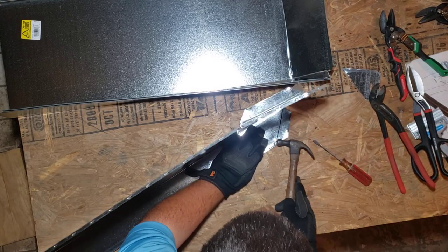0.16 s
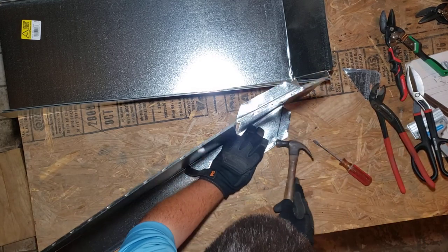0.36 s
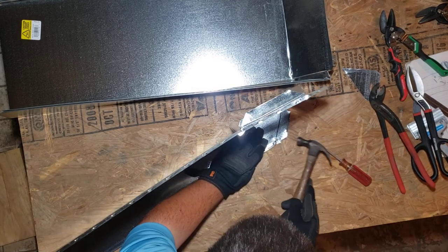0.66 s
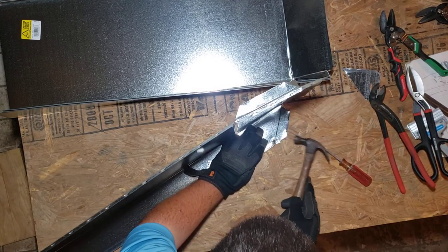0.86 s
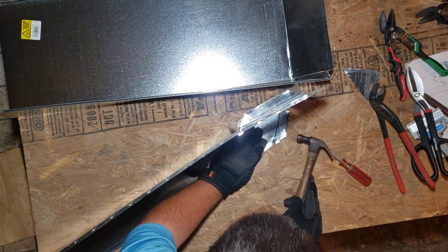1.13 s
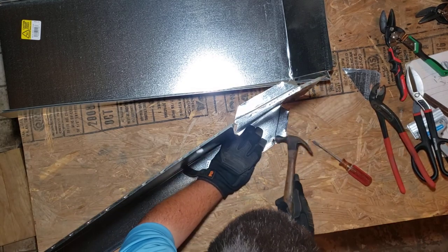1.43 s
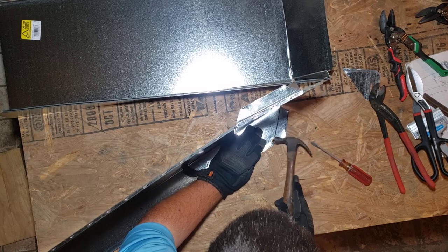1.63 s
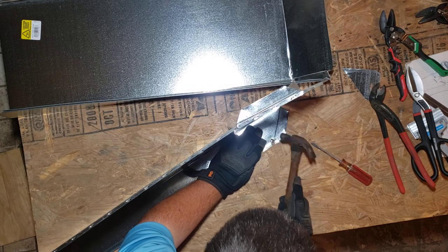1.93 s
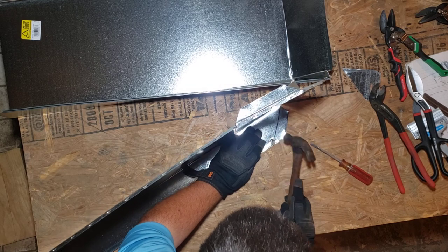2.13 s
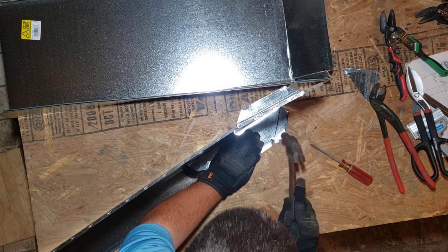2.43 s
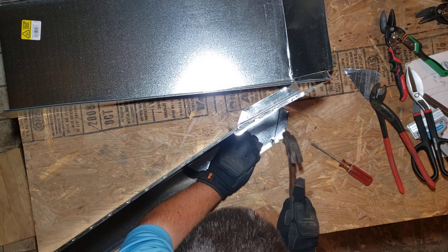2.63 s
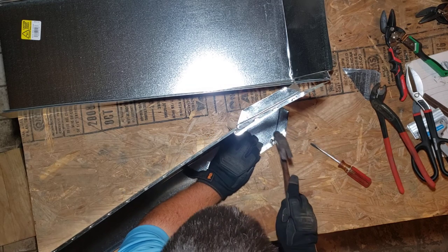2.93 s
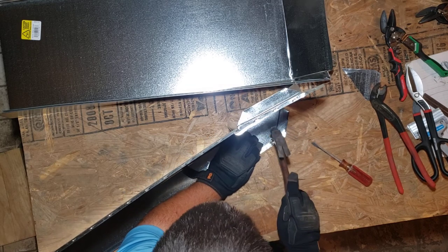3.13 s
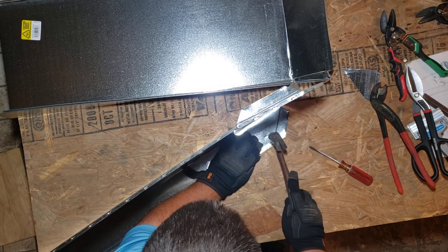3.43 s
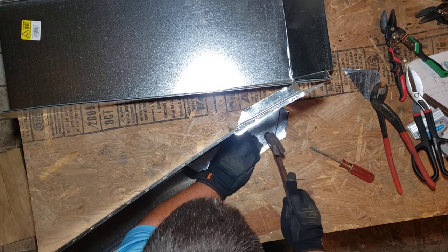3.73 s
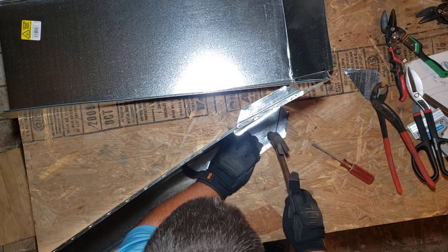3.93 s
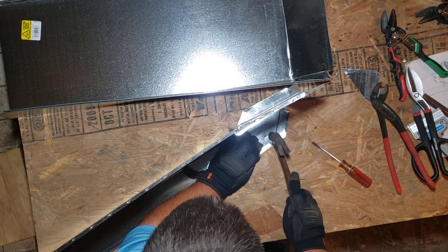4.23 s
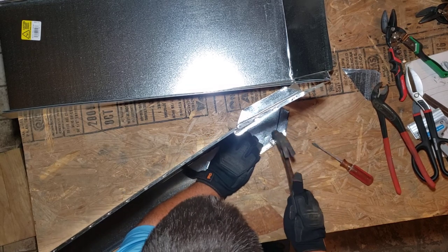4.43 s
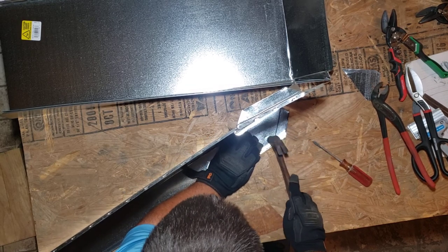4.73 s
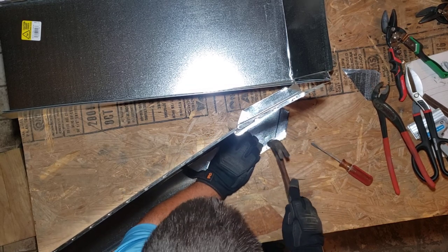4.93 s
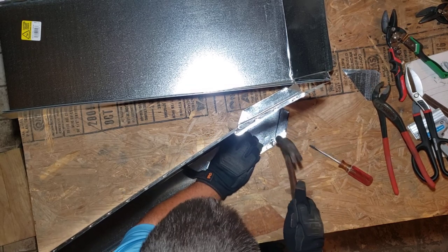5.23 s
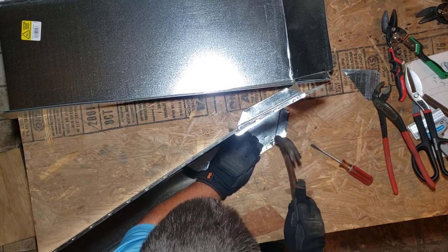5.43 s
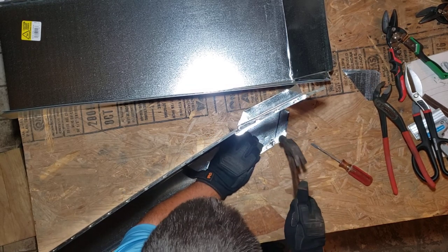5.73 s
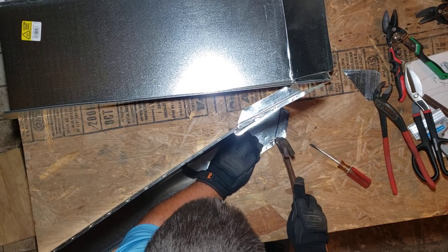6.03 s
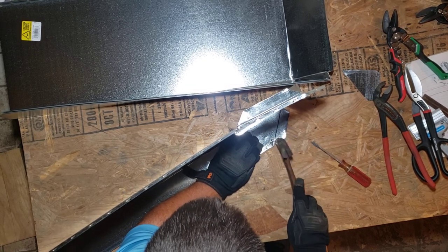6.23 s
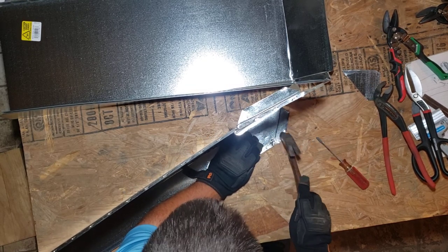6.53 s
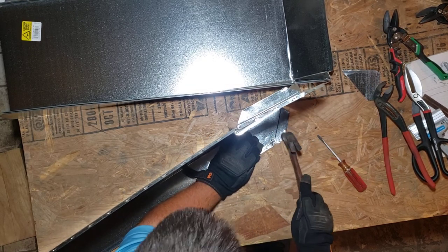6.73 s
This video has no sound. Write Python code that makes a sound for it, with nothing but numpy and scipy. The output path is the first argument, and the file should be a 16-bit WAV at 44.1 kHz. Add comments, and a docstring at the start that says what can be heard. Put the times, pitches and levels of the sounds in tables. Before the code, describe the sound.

A hammer works on a hollow sheet-metal duct lying on a wooden bench, heard close up in stereo in a small, quiet workshop. The sound begins in the ringing tail of a blow. Strikes follow at about 0.15, 0.35, 0.55, 0.75 and 1 second, the last strong, bright and tinny. After a short gap a weaker double contact comes at 1.4, a firm hit at 1.6, and softer ones at 1.8 and 2.0. From 2.2 seconds heavy blows fall steadily, four to five per second, until the end near 7, strongest around 5.6 to 5.8. Each is a low, woody thump with a boxy metallic boom, a short crack and a shivering wash dying in about half a second, overlapping the next. From about 2.8 seconds tiny dry metallic ticks, around three kilohertz, scatter between blows. A very faint, low room hush lies underneath.

```python
"""A hammer flattens the seam of a sheet-metal duct that lies on a wooden bench in a small workshop.
Each blow is an impulse: it excites damped modes of the bench, duct walls, loose flap and thin sheet.
Modes too dense to tell apart are bands of decaying noise, led by a short crack in each blow.
A loose part ticks as narrow damped modes, scattered after the later blows.
Steady band noise is the quiet hush of the room."""
import sys
import numpy as np
from scipy import signal
from scipy.io import wavfile

SR = 44100
rng = np.random.default_rng(int(sys.argv[2]) if len(sys.argv) > 2 else 0)


def digitize_waveform(pressure):
    """Quantize a signal to 16-bit integers and store it at the path in sys.argv[1].

    Rows of a 2-D input are taken as channels; values are limited to [-1, 1].
    """
    field = np.atleast_2d(pressure).T
    bounded = np.clip(field, -1, 1)
    quanta = np.round(bounded * 32767).astype(np.int16)
    wavfile.write(sys.argv[1], SR, quanta)


N = 302967
RUN_IN = 4410   # samples ahead of time zero, cut off at the end
LENGTH = N + RUN_IN

# Levels in the tables are relative; a swing is the signed size of a mode's first half-wave.
# A side share adds to the left and takes from the right when positive.
# Hammer blows, the first just before time zero, two led in by a light touch:
# (time [s], strength [dB], share through the bench [dB], share into the loose flap [dB])
BLOWS = [(-0.091, -6, 3, 1), (0.148, -27, 9, -15), (0.158, -7.5, -0.5, 2), (0.364, -3, -1.5, 4),
         (0.567, -4, 1.5, 9.5), (0.774, -5.5, 3.5, 2.5), (0.987, -1.5, -7.5, 5), (1.394, -19.5, 6, 3),
         (1.413, -10, 5.5, 2), (1.618, -2, 1, 8), (1.811, -12.5, 13, 3.5), (2.013, -6.5, 7.5, 1),
         (2.237, -3, 9, -8), (2.528, -1.5, 6, -5), (2.766, -2, 7, -11), (2.994, -0.5, 4.5, 2),
         (3.233, -1, 3.5, 4.5), (3.468, -3.5, 4.5, -2.5), (3.674, -4, 6, 0), (3.871, -2.5, 4, 3),
         (4.073, -3, 4.5, -13), (4.277, -1.5, 3, -2), (4.494, -0.5, 3.5, 2), (4.718, -2.5, 5, 4),
         (4.915, -3, 8, -14), (5.138, -2.5, 7, 4.5), (5.349, -1, 4.5, -1.5), (5.57, 0, 5.5, 2),
         (5.798, 0.5, 3, 3), (6.054, -2, 2.5, 4.5), (6.26, -2.5, 3, 8.5), (6.443, -1.5, 3, 4.5),
         (6.642, -1.5, 2.5, 5.5)]
# Brightness of a full blow as the hammer works along the seam:
# (time [s], sheet share [dB], sizzle share [dB], crack level [dB])
SEAM = [(-0.1, -17.5, -21, -29), (0.57, -10, -12.5, -24.5), (0.99, -9.5, -8.5, -34),
        (1.42, -15.5, -16, -22), (2.02, -15.5, -17.5, -23), (2.53, -15.5, -14, -30.5), (3.0, -15, -15, -35),
        (3.24, -13, -14.5, -25), (3.5, -17, -18, -26), (4.1, -18, -18.5, -29.5), (5.1, -16.5, -14.5, -32),
        (5.599, -15, -13, -50), (6.2, -15.5, -19.5, -24.5), (6.701, -13.5, -20, -32)]
# Low modes of the bench: (frequency [Hz], level [dB], T60 [s], first swing [1], side share [1])
BENCH_MODES = [(62.4, -13, 0.17, -1, .04), (74.24, -15.5, 0.64, 0.99, 0.099), (80.2, -13.5, 0.24, 1, 0.03),
               (99, -6, 0.18, 0.84, 0.078), (102.25, -12.5, 0.18, -1.35, 0.021),
               (117.9, -10, 0.22, -0.92, 0.084), (136.4, -22, 0.52, -0.52, 0.29),
               (165.6, -18, 0.21, -0.54, 0.076)]
# Modes of the duct walls: (frequency [Hz], level [dB], T60 [s], first swing [1], side share [1])
DUCT_MODES = [(193.7, -30, 0.25, -1.4, 0.14), (233, -18.5, 0.099, 0.019, 0.3),
              (233.4, -27, 0.49, -1.55, 0.31), (265.4, -26.5, 0.7, 0.86, 0.26),
              (304.5, -15, 0.39, 0.94, 0.088), (318, -19, 0.27, 0.95, 0.11), (346.8, -18, 0.29, -0.73, .45),
              (358.4, -23.5, 0.41, 0.97, 0.69), (394, -27, 0.6, -1.11, 0.43)]
# Modes of the loose flap: (frequency [Hz], level [dB], T60 [s], first swing [1], side share [1])
FLAP_MODES = [(448, -42, 0.45, 0.91, .4), (503.6, -11, 0.11, 0.69, -0.14), (523, -27, 0.68, 0.38, .1),
              (528.1, -10.5, 0.1, -0.73, 0.069), (551, -31.5, 0.29, -0.97, -1.8),
              (582, -37, 0.52, -0.78, -.4), (622.5, -30, 0.68, 0.77, -0.016)]
# Clear modes of the thin sheet: (frequency [Hz], level [dB], T60 [s])
SHEET_MODES = [(758, -4.5, 0.29), (796, -20, 0.1), (886, -11, 0.49), (932, -18.5, 0.52),
               (1011, -12.5, 0.91), (1083, -16, 1), (1124, -9, 0.6), (1185, -13, 0.75), (1497, -13.5, 0.3),
               (1788, -6.5, 0.26), (1876, -5.5, 0.21), (1943, -14.5, 0.25), (2037, -13, 0.092),
               (2360, -14, 0.3), (2570, -11.5, 0.25), (2830, -13.5, .15), (3170, -11, 0.23),
               (3900, -14.5, 0.044), (4770, -23, 0.085)]
# Shimmer of dense modes, and the room's answer:
# (frequency [Hz], level per Hz [dB], T60 [s], build-up [s])
SHIMMER = [(30, -23, 0.94, 0.022), (120, -4.5, 0.3, 0.0086), (287, -3, 0.59, 0.017),
           (594, -6, 0.54, 0.0027), (740, -10.5, 0.58, 0.002), (1045, -7, 0.63, 0.0022),
           (1494, -19, 0.65, 0.0016), (1873, -9, 0.6, 0.0013), (2130, -14.5, 0.54, 0.0093),
           (2920, -14.5, 0.47, 0.0032), (4780, -17, 0.37, 0.0044), (6070, -25, 0.29, 0.012),
           (9330, -25, 0.33, 0.0081), (15100, -21, 0.31, 0.011), (16000, -22, .3, .015)]
# Spectrum of the room hush: (frequency [Hz], level per Hz [dB])
HUSH = [(30, -20), (75, 2.5), (130, -9), (270, -4.5), (1500, -16.5), (4000, -27), (16000, -44)]
# Likeness of left and right in shimmer and hush: (frequency [Hz], correlation [1])
LIKENESS = [(60, 0.9), (180, 0.91), (550, 0.31), (1650, -0.077), (4970, -0.033), (15000, -0.0072)]
# Stereo balance: (frequency [Hz], left minus right [dB])
LEAN = [(60, 1.5), (130, 3.5), (290, 1), (640, 1.5), (1410, 2.5), (3100, 5.5), (6820, -5.5), (15000, -4.0)]
# Ticks of the loose part that stand out clearly, loud and faint: (time [s], level [dB])
TICKS = [(2.7814, -30), (2.826, -25), (3.0565, -20), (3.6995, -22), (3.733, -24), (4.132, -26),
         (4.2298, -41), (4.2868, -27), (4.3044, -29), (4.3385, -18.5), (4.6079, -36), (4.6573, -36),
         (4.729, -21), (4.774, -29), (5.0194, -28), (5.1644, -24), (5.213, -27), (5.38, -22), (5.4071, -26),
         (5.5184, -36), (5.5822, -23), (5.5994, -26), (5.637, -18), (5.863, -18), (6.0636, -24),
         (6.0831, -26), (6.2896, -25), (6.4292, -35), (6.5041, -27)]
# Modes of the ticking part: (frequency [Hz], level [dB], T60 [s], first swing [1], side share [1])
TICK_MODES = [(3117, -0.5, 0.038, 1, 0.44), (3220, -4, 0.039, 0.97, 0.23)]

DUCT_DB, SHEET_DB, SHIMMER_DB, HUSH_DB = 3.5, -10.5, -32, -66.5
# dB of share gained per dB that a blow is softer: light blows sound thinner
SHEET_SOFT, SIZZLE_SOFT = 0.26, 0.51
PAIR_SPLIT = 0.02003   # relative gap between the two halves of a sheet mode
PAIR_LEAN_DB = 8.5   # left minus right of the upper half, reversed for the lower; LEAN adds to it
WALL_SHARE_DB = -12   # share of the walls in the shimmer
BAND_SCATTER_DB = 1.62   # spread of each blow's level in each band
SHIMMER_DELAY_S, CRACK_T60_S, CRACK_LEFT_LAG = 0.00058, 0.037, 3   # lag in samples
CLATTER_DB, CLATTER_HZ = 1.25, 68.5   # spread of the wash level and corner of its flicker
# From this time on every blow also shakes loose three faint ticks, weaker the later they come
LOOSE_FROM_S, CHATTER_FIRST_S, CHATTER_LAST_S = 2.1, 0.065, 0.16
CHATTER_DB, CHATTER_LOSS_DB_PER_S = -27.5, 90   # level at no wait, and loss with waiting
TICK_SCATTER_DB = 1.5
MIC_LOW_HZ, MIC_PEAK_HZ, MIC_PEAK_WIDTH_HZ, MIC_PEAK_DB = 44, 15700, 520, -5
CUTOFF_HZ = 16900


def from_db(db):
    """Amplitude follows level logarithmically: 20 dB is a factor of ten."""
    return 10 ** (np.asarray(db) / 20)


def at_hz(points, hz):
    """Spectral columns are interpolated along a logarithmic frequency axis."""
    freqs, *columns = np.transpose(points)
    return [np.interp(np.log(hz), np.log(freqs), column) for column in columns]


def clicks(times, sizes):
    """Impulse excitation: one single-sample click per event, over a negligible constant."""
    out = np.full(LENGTH, 1e-18)
    np.add.at(out, np.round(times * SR).astype(int) + RUN_IN, sizes)
    return out


def ring(x, hz, t60):
    """Damped resonance: a unit click starts a decaying sine of initial height 1."""
    decay = from_db(-60 / (t60 * SR))
    angle = 2 * np.pi * hz / SR
    return signal.lfilter([0, np.sin(angle)], [1, -2 * decay * np.cos(angle), decay * decay], x)


def fade(x, t60, rise_s):
    """Energy storage and loss: an envelope builds up after each click and decays exponentially."""
    decay = from_db(-60 / (t60 * SR))
    lag = np.exp(-1 / (max(rise_s, 1e-4) * SR))
    decaying = signal.lfilter([1], [1, -decay], x)
    return signal.lfilter([1 - lag], [1, -lag], decaying)


def lean(hz, extra_db):
    """Level panning: the left-right difference at a frequency is split evenly between two gains."""
    difference_db = at_hz(LEAN, hz)[0] + extra_db
    return from_db([[difference_db / 2], [-difference_db / 2]])


def struck(modes, times, blow_db, scatter_db):
    """Modal superposition: each blow excites every mode a little differently, with a fixed side share."""
    out = np.zeros((2, LENGTH))
    scatter = rng.normal(0, 1, (len(times), len(modes)))
    for k, (hz, db, t60, swing, side) in enumerate(modes):
        sizes = swing * from_db(blow_db + db + scatter_db * scatter[:, k])
        sound = ring(clicks(times, sizes), hz, t60)
        out += [(1 + side) * sound, (1 - side) * sound]
    return out


def bench(times, blow_db):
    """Low-frequency modal response: each blow thuds through the damped modes of the bench."""
    return struck(BENCH_MODES, times, blow_db, scatter_db=1.0)


def duct_walls(times, strength_db):
    """Plate resonance: each blow rings the modes of the duct walls."""
    return struck(DUCT_MODES, times, strength_db + DUCT_DB, scatter_db=1.5)


def loose_flap(times, blow_db):
    """Flap resonance: the share of each blow entering the loose flap rings its own modes."""
    return struck(FLAP_MODES, times, blow_db, scatter_db=2.5)


def thin_sheet(times, blow_db, scatter_db):
    """Beating of paired modes: where the hammer lands sets each half's strength and sign anew."""
    out = np.zeros((2, LENGTH))
    scatter = rng.normal(0, 1, (len(times), len(SHEET_MODES), 2, 2))
    for k, (hz, db, t60) in enumerate(SHEET_MODES):
        for half, split in enumerate((-1, 1)):
            size, swing = scatter[:, k, half].T
            sizes = np.sign(swing) * from_db(blow_db + db + scatter_db * size)
            sound = ring(clicks(times, sizes), hz * (1 + split * PAIR_SPLIT / 2), t60)
            out += lean(hz, split * PAIR_LEAN_DB) * sound
    return out


def clatter(corner_hz):
    """Random modulation: loose seams make the wash flicker as low-passed noise of spread 1."""
    pole = np.exp(-2 * np.pi * corner_hz / SR)
    x = signal.lfilter([1], [1, -2 * pole, pole * pole], rng.standard_normal(LENGTH))
    return x / x.std()


def shimmer_and_hush(times, strength_db, sheet_db, sizzle_db, crack_db):
    """High modal density: each blow adds a noise crack and a dying wash, over the steady hush."""
    out = np.zeros((2, LENGTH))
    edges = 25 * 2 ** np.r_[0:2:.5, 2:9.5:1 / 3]   # half-octave, then third-octave bands [Hz]
    white = rng.standard_normal((2, 2, LENGTH))   # neighbouring bands take different noise
    colour = rng.normal(0, 1, (len(times), len(edges)))
    flicker = from_db(2 * CLATTER_DB * clatter(CLATTER_HZ))
    for k, (low, high) in enumerate(zip(edges, edges[1:])):
        hz = np.sqrt(low * high)
        band = signal.butter(2, [low, high], "band", fs=SR, output="sos")
        mid, side = signal.sosfilt(band, white[k % 2])
        alike = np.clip(at_hz(LIKENESS, hz)[0], -1, 1)
        level_db, t60, rise_s = at_hz(SHIMMER, hz)
        # lows follow the walls, mids the sheet, highs the sizzle of metal on metal
        walls, sheet, sizzle = [np.interp(np.log(hz), np.log([500, 1500, 9000]), w) for w in np.eye(3)]
        share_db = WALL_SHARE_DB * walls + sheet * sheet_db + sizzle * sizzle_db
        blow_db = strength_db + share_db + level_db + BAND_SCATTER_DB * colour[:, k]
        # blows add in power, whose dB level doubles here, so its T60 is half
        wash = fade(clicks(times, from_db(2 * (blow_db + SHIMMER_DB))), t60 / 2, rise_s)
        crack = fade(clicks(times, from_db(2 * (blow_db + crack_db))), CRACK_T60_S / 2, 0)
        hush = from_db(2 * (HUSH_DB + at_hz(HUSH, hz)[0]))
        noise = np.sqrt(1 + alike) * mid + np.sqrt(1 - alike) * side * [[1], [-1]]
        diffuse = np.sqrt(wash * flicker + hush) * noise
        crack_noise = np.sqrt(crack) * mid
        direct = [np.roll(crack_noise, CRACK_LEFT_LAG), crack_noise]   # one source, two arrivals
        out += np.sqrt(SR) * lean(hz, 0) * (diffuse + direct)
    return out


def ticks(blow_times):
    """Contact excitation: a soft contact, made by a band-pass, swells into quickly damped modes."""
    listed_times, listed_db = np.transpose(TICKS)
    shaken = blow_times[blow_times > LOOSE_FROM_S]
    wait = rng.uniform(CHATTER_FIRST_S, CHATTER_LAST_S, (len(shaken), 3))
    chatter_times = (shaken[:, None] + wait).ravel()
    chatter_db = CHATTER_DB - CHATTER_LOSS_DB_PER_S * wait.ravel()
    times = np.r_[listed_times, chatter_times]
    level_db = np.r_[listed_db, chatter_db]
    soft = signal.butter(2, [2950, 3400], "band", fs=SR, output="sos")
    return signal.sosfilt(soft, struck(TICK_MODES, times, level_db, scatter_db=TICK_SCATTER_DB))


def scene():
    """Linear superposition: the responses to the blows, the ticks and the hush add up."""
    times, strength_db, bench_db, flap_db = np.transpose(BLOWS)
    seam_times, *brightness = np.transpose(SEAM)
    sheet_db, sizzle_db, crack_db = [np.interp(times, seam_times, c) for c in brightness]
    sheet_db = sheet_db - SHEET_SOFT * strength_db
    sizzle_db = sizzle_db - SIZZLE_SOFT * strength_db
    out = bench(times, strength_db + bench_db)
    out += duct_walls(times, strength_db)
    out += loose_flap(times, strength_db + flap_db)
    out += thin_sheet(times, strength_db + sheet_db + SHEET_DB, scatter_db=3.5)
    out += shimmer_and_hush(times + SHIMMER_DELAY_S, strength_db, sheet_db, sizzle_db, crack_db)
    out += ticks(times)
    return out[:, RUN_IN:]


def record(dry):
    """Transducer response: the microphone loses deep bass, resonates high up and saturates; the top is cut."""
    bass_cut = signal.butter(2, MIC_LOW_HZ, "high", fs=SR, output="sos")
    x = signal.sosfilt(bass_cut, dry)
    peak = signal.iirpeak(MIC_PEAK_HZ, MIC_PEAK_HZ / MIC_PEAK_WIDTH_HZ, fs=SR)
    x = x + from_db(MIC_PEAK_DB) * signal.lfilter(*peak, x)
    rounded = 1.148 * np.tanh(x / 1.467)
    top_cut = signal.cheby2(12, 70, CUTOFF_HZ, fs=SR, output="sos")
    return signal.sosfilt(top_cut, rounded)


dry = scene()
out = record(dry)
digitize_waveform(out)
```